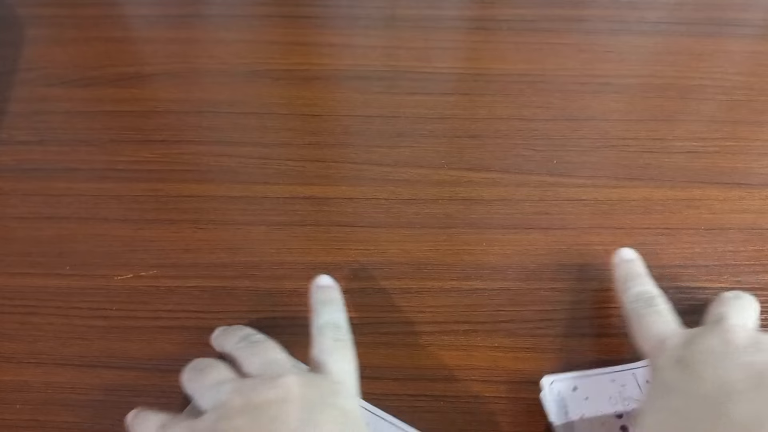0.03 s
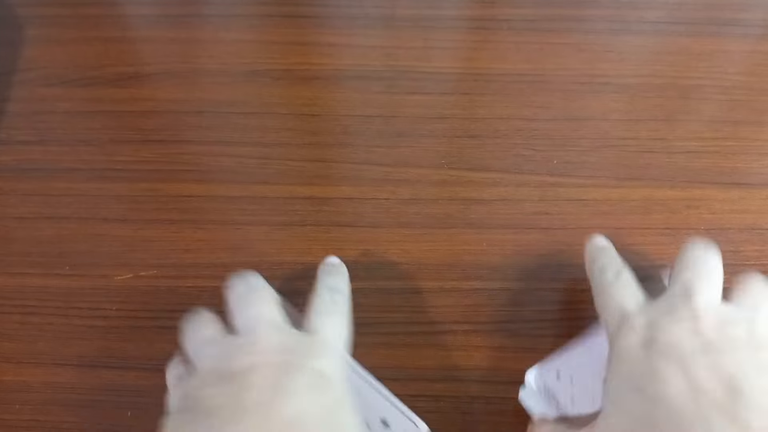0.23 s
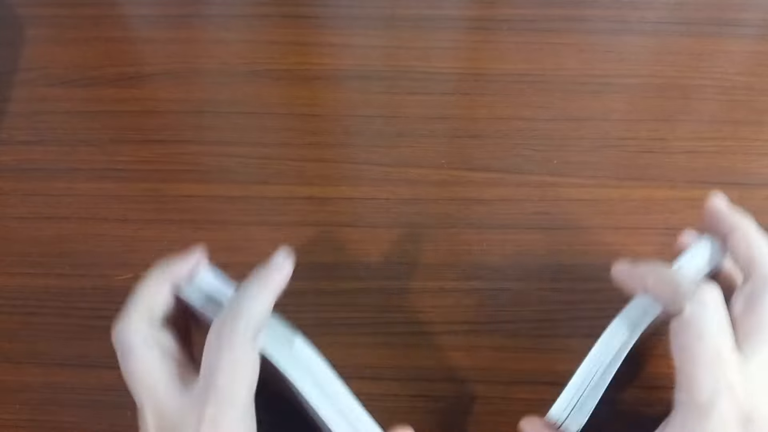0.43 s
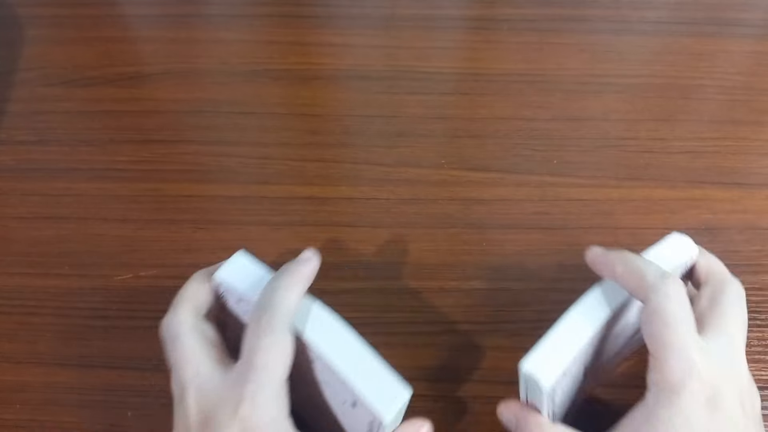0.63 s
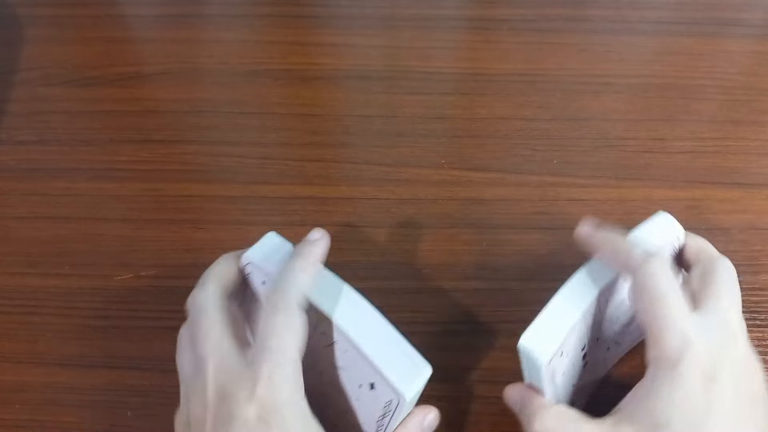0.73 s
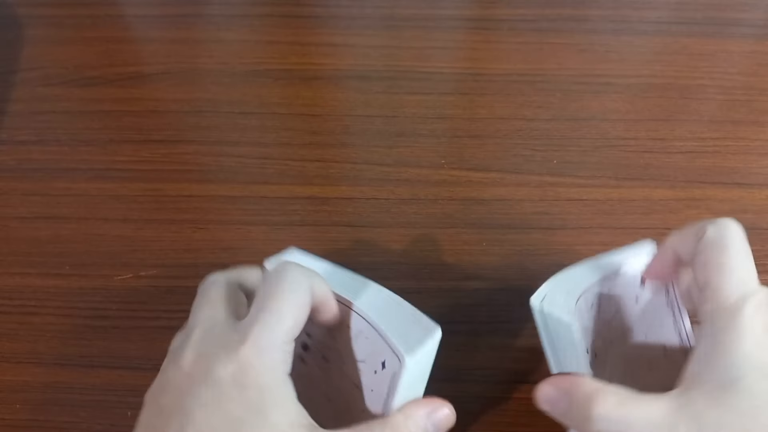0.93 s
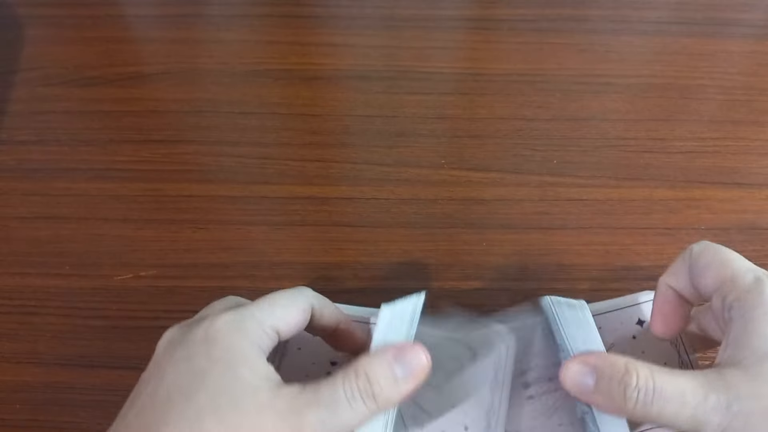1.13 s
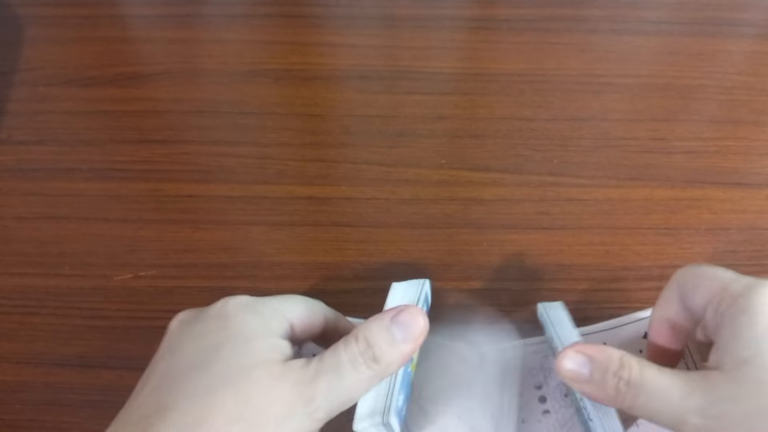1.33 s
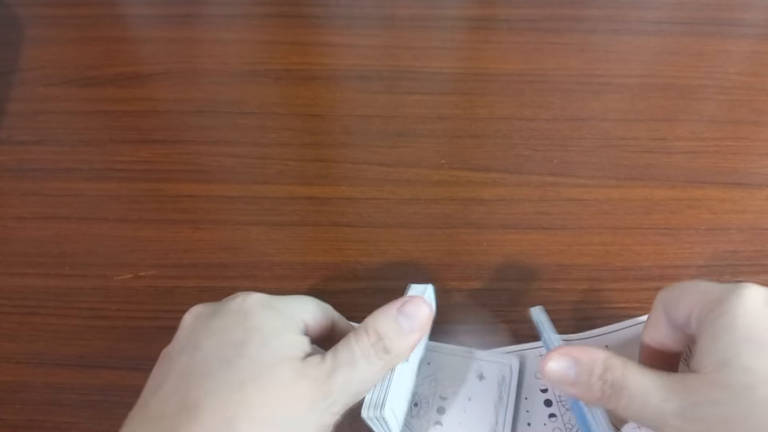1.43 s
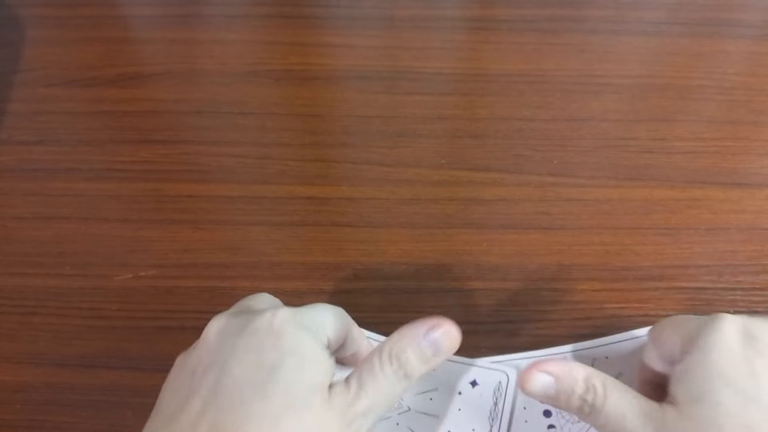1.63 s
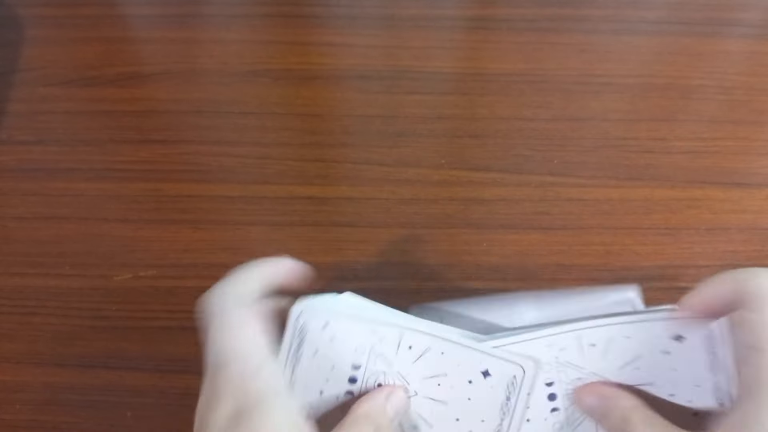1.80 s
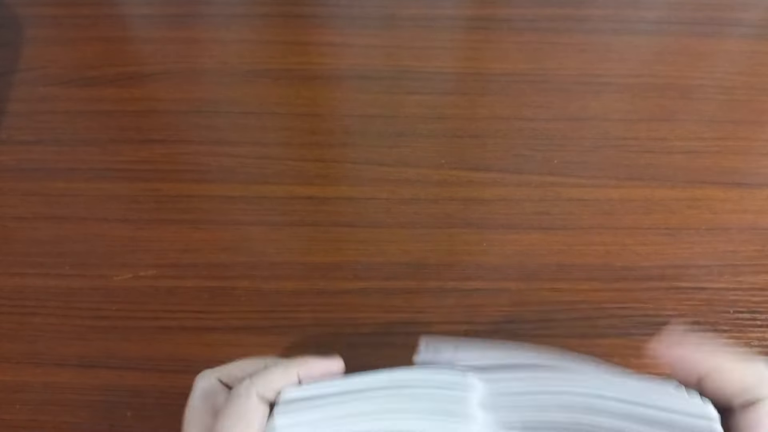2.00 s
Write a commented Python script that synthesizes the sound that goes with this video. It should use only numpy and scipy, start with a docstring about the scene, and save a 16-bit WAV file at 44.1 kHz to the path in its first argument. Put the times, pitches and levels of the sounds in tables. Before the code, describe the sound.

Playing cards riffle on a wooden table. A brief clattering knock and a pause come first, then crisp snaps grow louder and denser, stop abruptly, and a faint slide and a dull tap follow; close, dry indoor sound.

```python
"""Riffle shuffle on a table

A deck of cards is riffle-shuffled on a wooden table in a small room.
Two halves knock and clack on the wood, then the cards snap down in a fast, uneven run.
They slide softly together and the deck is set down with a dull knock.
Touches are short bursts of coloured noise, slides are grainy noise with a faint squeak.
The touches and slides make the table ring and the room echo, over a low rumble and hiss.
"""
import sys
import numpy as np
from scipy import signal
from scipy.fft import rfft, irfft
from scipy.io import wavfile

SR = 44100
rng = np.random.default_rng(int(sys.argv[2]) if len(sys.argv) > 2 else 0)


def transcribe(signal):
    """Save signal, clipped to [-1, 1], as a 16-bit WAV file at the path in sys.argv[1]."""
    frames = np.atleast_2d(signal).T
    limited = np.clip(frames, -1, 1)
    pcm = np.round(limited * 32767).astype(np.int16)
    wavfile.write(sys.argv[1], SR, pcm)


N = 90757  # length [samples]

# Every colour table below is a tone balance; only the differences between its points matter.
# background levels: (time [s], level [dB])
RUMBLE_LEVEL = [(0, -57), (.25, -53), (.52, -54.5), (.72, -60), (1.0, -55.5), (1.7, -63), (2.05, -53.5)]
HISS_LEVEL = [(0, -62.5), (.25, -62), (.5, -57.5), (.72, -68.5), (1.0, -65), (1.75, -67.5), (2.05, -65)]
# background colours: (frequency [Hz], level [dB])
RUMBLE_COLOUR = [(18, -30), (30, -3), (45, -23.5), (70, 1.5), (130, -2.5), (195, -5.5), (275, 0), (430, -3),
                 (700, -14), (1200, -19), (2500, -31), (6000, -30.5)]
HISS_COLOUR = [(1000, 4), (3000, -9), (5000, -0.5), (7000, 2), (11000, -0.5), (12500, -9.5), (16000, -6)]

# hands and packets bump softly on the table: (time [s], level [dB], rise [s], decay [s])
BUMPS = [(.002, -49, 0.0046, 0.063), (.06, -48, .01, 0.017), (.195, -45, 0.0058, 0.016),
         (0.376, -48.5, 0.0025, 0.018), (1.349, -37, 0.0079, 0.029), (1.44, -33.5, 0.0063, 0.018),
         (1.524, -34, 0.0024, 0.022), (1.603, -37, 0.005, 0.014), (1.672, -51, 0.0034, 0.011)]
# colour of a bump: (frequency [Hz], level [dB])
BUMP_COLOUR = [(20, -32), (50, -6), (80, -7), (120, 5.5), (170, -1), (260, 6.5), (340, -19.5), (700, -22),
               (2000, -56)]

# cards slide over each other: (time [s], swish level [dB], rise [s], decay [s], squeak level [dB])
SLIDES = [(0.184, -52.5, 0.019, 0.025, -81), (0.425, -56, .002, 0.0052, -69),
          (0.985, -56, 0.002, 0.0017, -67), (1.05, -60, 0.016, 0.021, -70),
          (1.76, -67, 0.041, 0.034, -69.5), (1.8178, -51, 0.0014, 0.0015, -47),
          (1.826, -51, .009, 0.034, -71), (1.898, -58, .003, 0.0058, -64), (1.912, -70, .008, .02, -63.5),
          (1.931, -66, 0.0044, 0.015, -55)]
# colour of the swish: (frequency [Hz], level [dB])
SLIDE_COLOUR = [(100, -8), (300, -12), (1500, -11), (2600, -5.5), (3300, -1), (3750, 0), (4200, 0),
                (5200, -3), (5950, 3.5), (6800, -1), (8000, -4.5), (11000, -5.5), (15000, -29)]
SLIDE_GRAIN_DB = 2  # random unevenness of the friction
SQUEAK_HZ, SQUEAK_WIDTH_HZ = 2670, 220

# a packet meets the table broadside: (time [s], level [dB], rise [s], decay [s])
KNOCKS = [(0.528, -40, 0.0052, 0.0058), (.5379, -21, 0.00072, 0.0081), (0.9838, -53, 0.00041, 0.0076)]
# colour of a knock: (frequency [Hz], level [dB])
KNOCK_COLOUR = [(20, -46), (50, -28), (110, -11), (165, -4), (270, -8), (420, 1), (500, -12), (680, -5),
                (830, 7.5), (1050, -7.5), (1350, -2), (1750, -11), (2200, -28), (4000, -32), (14000, -62)]
KNOCK_CLICK = 7  # size of the single-sample click, before the burst is set to its level

# loose card edges clack on the wood:
# (time [s], body level [dB], rise [s], body decay [s], bright edge level [dB])
CLACKS = [(0.5599, -22.5, 0.00033, .005, -37), (.5645, -22, 0.00055, 0.0043, -39),
          (.569, -22.5, 0.0018, 0.0043, -25), (0.5732, -25, 0.0011, 0.0064, -37),
          (0.577, -34, .001, 0.0046, -43), (0.587, -30, 0.0022, .012, -41.5),
          (0.604, -32, 0.0011, 0.028, -44)]
# colours of the body and the bright edge of a clack: (frequency [Hz], level [dB])
CLACK_COLOUR = [(20, -52), (70, -24), (220, -4.5), (420, 0), (720, -3), (930, 7.5), (1080, 0), (1330, -0.5),
                (1700, -1), (2900, -0.5), (3700, -7), (5000, -15), (8000, -48)]
CLACK_EDGE_COLOUR = [(2500, -23), (4600, 2.5), (6000, 1), (7500, -5), (8600, -1.5), (10000, -18),
                     (13000, -29), (16000, -49)]

# cards leave the thumbs; each part's level is shifted by its trim below:
# (time [s], slap on the pile [dB], crack of the card [dB], tick of its edge [dB])
SNAPS = [(1.075, -48.5, -57, -46), (1.096, -37.5, -38, -50), (1.1039, -37, -38, -41.5),
         (1.127, -40.5, -37, -42), (1.136, -32.5, -23.5, -26), (1.146, -28.5, -28.5, -55),
         (1.1736, -45, -32, -40), (1.183, -39.5, -42, -47), (1.191, -42, -38, -45),
         (1.204, -57, -35.5, -37.5), (1.207, -43, -40, -51), (1.214, -56, -49, -44),
         (1.221, -36.5, -32, -41.5), (1.232, -43, -39.5, -47), (1.24, -34, -42, -47),
         (1.245, -31, -29.5, -46), (1.2617, -41.5, -31, -35.5), (1.2824, -39, -33.5, -38),
         (1.293, -29.5, -33.5, -43), (1.308, -46, -32, -40), (1.3218, -39, -41, -38.5),
         (1.3343, -30, -24.5, -33), (1.348, -39, -24, -37), (1.3525, -30, -21, -30), (1.358, -39, -36, -50),
         (1.362, -51, -49, -36), (1.3722, -34.5, -34, -36), (1.388, -60, -39, -42),
         (1.398, -32.5, -21, -32.5), (1.409, -41, -48, -58), (1.417, -35.5, -28.5, -35.5),
         (1.43, -34, -25.5, -30.5), (1.442, -30.5, -31, -34.5), (1.446, -32, -29, -38),
         (1.455, -33.5, -33, -48), (1.468, -37.5, -45, -32), (1.4761, -39, -22, -26),
         (1.484, -27, -21, -26), (1.495, -26.5, -19.5, -35), (1.4984, -30.5, -27.5, -28.5),
         (1.501, -33, -24, -38), (1.511, -37, -31, -31), (1.522, -29, -29.5, -32), (1.53, -29, -29, -44),
         (1.537, -28.5, -51, -34), (1.542, -39, -20, -26.5), (1.545, -50, -29.5, -35),
         (1.552, -37, -24.5, -24.5), (1.5624, -19, -15.5, -43), (1.566, -25, -32, -27.5),
         (1.578, -43, -21.5, -28.5), (1.5822, -26, -28, -44), (1.586, -29.5, -51, -32.5),
         (1.5977, -24, -21.5, -30), (1.61, -17.5, -18, -22), (1.619, -54, -50, -49), (1.633, -30, -37, -31),
         (1.637, -63, -28.5, -32.5), (1.644, -26.5, -18, -23.5), (1.652, -62, -35.5, -43)]
SLAP_TRIM_DB, CRACK_TRIM_DB, TICK_TRIM_DB = -0.5, -1.5, 0.5
# colours of the parts of a snap, with the finest part of the tick last: (frequency [Hz], level [dB])
SLAP_COLOUR = [(20, -34), (50, -26), (110, -13), (170, -6), (250, -5.5), (340, -5.5), (480, 1), (660, -1.5),
               (950, -4), (1200, -15.5), (2500, -56)]
CRACK_COLOUR = [(800, -18.5), (1300, -8), (1550, -4.5), (1850, 2), (2150, -2), (2550, 1.5), (2950, -2.5),
                (3300, -4), (4200, -8), (6000, -27.5)]
TICK_COLOUR = [(3000, -23.5), (4600, -0.5), (5500, 1), (7500, -1), (10000, -8.5), (13000, -16.5),
               (16000, -38)]
CRISP_COLOUR = [(6000, -33), (9500, 6), (12000, 2), (16000, -0.5)]
# the finest part of the tick is strongest mid-run, where the cards are bent most:
# (time [s], level against the tick before its trim [dB])
CRISPNESS = [(1.09, -24), (1.2, -6.5), (1.27, -5), (1.4, -5), (1.5, -5.5), (1.56, -22), (1.65, -31)]
# typical times, varied from card to card
SNAP_RISE_S, SLAP_DECAY_S, CRACK_DECAY_S, TICK_DECAY_S = 0.0009, 0.0017, 0.0026, 0.0013
CARD_SPREAD = 0.25  # spread of those times, in natural-log units
CARD_COLOUR_DB = 3.5  # random spread at each colour point
SNAP_CLICK = 1.8  # size of the single-sample click, before the burst is set to its level
FLUTTER_DB, FLUTTER_DECAY_S = -18, 0.008  # the card rubs on the pile; level against the main chatter

# the whole deck is set down: (time [s], level [dB], rise [s], decay [s])
SET_DOWNS = [(1.989, -49.5, 0.0089, 0.01), (2.013, -41.5, 0.0034, .004), (2.022, -33.5, 0.00179, 0.0056),
             (2.027, -25.5, 0.001995, 0.0029)]
# colour of a set-down: (frequency [Hz], level [dB])
SET_DOWN_COLOUR = [(20, -33), (60, -17), (125, 1), (170, -3.5), (235, 1), (310, -5.5), (410, -2.5),
                   (470, -2), (540, 2), (640, -10), (760, 5.5), (850, 4), (1080, -14), (1330, -8),
                   (1600, -22.5), (2350, -13), (3000, -32), (14000, -42.5)]

LEVEL_WINDOW_S = 0.004  # a touch's level is its energy averaged over this time
GRAIN_DB = 3.0  # random unevenness of the chatter within one touch

# ringing tones of the table, all lowered by TABLE_DB:
# (frequency [Hz], strength [dB], time to fall 60 dB [s])
TABLE_TONES = [(116, -3, 0.34), (166.3, 3.5, 0.21), (236.8, 3.5, 0.15), (300, -32, 0.18), (413, -1.5, 0.14),
               (555, 0, 0.084), (634, 6, 0.081), (737, -9.5, .12), (917, -9.5, 0.057), (1910, -16, 0.036),
               (2506, 0, 0.053), (3030, -4, 0.048), (3150, -3, .04)]
TABLE_DB = -55.5

# how long the room rings: (frequency [Hz], time to fall 60 dB [s])
ROOM_T60 = [(150, 0.01), (600, 0.254), (2500, 0.1856), (6000, 0.1154), (14000, 0.16)]
# colour of the room's echo: (frequency [Hz], level [dB])
ROOM_COLOUR = [(60, -5), (200, 4), (600, -2.5), (1700, 2.5), (3000, -0.5), (5000, 2.5), (9000, -2.5),
               (15000, -4)]
TAIL_DB, TAIL_RISE_S = -15.5, 0.0052
EARLY_DB, EARLY_RISE_S, EARLY_DECAY_S = -13, 0.0017, 0.0049
CUTOFF_HZ = 15950


def from_db(db):
    """Turn decibels into a gain."""
    return 10 ** (np.asarray(db) / 20)


def unit_energy(x):
    """Scale to a total energy of one."""
    return x / np.sqrt(np.sum(x ** 2) + 1e-20)


def at_hz(points, hz):
    """Read a table at given frequencies, on a log-frequency axis."""
    f, v = np.transpose(points)
    return np.interp(np.log(np.maximum(hz, 1)), np.log(f), v)


def in_time(points):
    """Read a curve at every sample."""
    return np.interp(np.arange(N) / SR, *np.transpose(points))


def colour(x, spectrum, size=2048):
    """Give a sound a tone balance with a minimum-phase filter that keeps the level of white noise."""
    hz = np.arange(size + 1) * SR / (2 * size)
    cepstrum = irfft(np.log(from_db(at_hz(spectrum, hz))))
    # folding the cepstrum forward puts the filter's energy as early as possible
    cepstrum[1:size] *= 2
    cepstrum[size + 1:] = 0
    response = unit_energy(irfft(np.exp(rfft(cepstrum)))[:size])
    filtered = signal.fftconvolve(np.atleast_2d(x), response[None], axes=1)
    return filtered[:, :x.shape[-1]].reshape(x.shape)


def swell(t, rise, decay):
    """Rise in a straight line, then die away exponentially."""
    attack = np.clip(t / np.maximum(rise, 1e-5), 0, 1)
    return attack * np.exp(-np.maximum(t - rise, 0) / decay)


def grain(shape, spread_db):
    """Random gains, each held for 32 samples, make noise uneven."""
    return from_db(spread_db * np.repeat(rng.standard_normal(shape), 32, axis=-1))


def contacts(times, db, rise, decay, spectrum, click=0, flutter=0, uneven_db=0, size=6144):
    """Each touch is a coloured, quickly dying chatter, with an optional click and longer flutter."""
    count, t = len(times), np.arange(size) / SR
    envelope = swell(t, rise[:, None], decay[:, None])
    envelope = envelope + flutter * swell(t, rise[:, None], FLUTTER_DECAY_S)
    unevenness = grain((count, size // 32), GRAIN_DB)
    chatter = rng.standard_normal((count, size)) * envelope * unevenness
    # the click falls where the rise ends
    chatter[np.arange(count), (rise * SR).astype(int)] += click
    tints = uneven_db * rng.standard_normal((count, len(spectrum)))
    out = np.zeros(N + SR)
    for s, level, burst, tint in zip(times, db, chatter, tints):
        start = max(int(s * SR), 0)
        # the tint shifts the levels in the colour table, not its frequencies
        burst = colour(burst, np.array(spectrum) + np.outer(tint, [0, 1]))
        gain = from_db(level) * np.sqrt(LEVEL_WINDOW_S * SR)
        out[start:start + size] += gain * unit_energy(burst)
    return out[:N]


def background():
    """Low room noise and a thin hiss, each coloured noise that follows its own level curve."""
    rumble = from_db(in_time(RUMBLE_LEVEL)) * colour(rng.standard_normal(N), RUMBLE_COLOUR)
    hiss = from_db(in_time(HISS_LEVEL)) * colour(rng.standard_normal(N), HISS_COLOUR)
    return rumble + hiss


def bumps():
    """Hands and packets touch the table softly, giving low bursts without a click."""
    return contacts(*np.transpose(BUMPS), BUMP_COLOUR)


def slides():
    """Friction of card on card gives short grainy swishes and excites a faint squeaking resonance."""
    t = np.arange(N) / SR
    swish, squeak = np.zeros(N), np.zeros(N)
    for s, swish_db, rise, decay, squeak_db in SLIDES:
        shape = swell(t - s, rise, decay)
        swish += from_db(swish_db) * shape
        squeak += from_db(squeak_db) * shape
    friction = rng.standard_normal(N) * grain(N // 32 + 1, SLIDE_GRAIN_DB)[:N]
    resonance = signal.iirpeak(SQUEAK_HZ, SQUEAK_HZ / SQUEAK_WIDTH_HZ, fs=SR)
    # make up for the noise lost outside the narrow band
    makeup = np.sqrt(SR / (np.pi * SQUEAK_WIDTH_HZ))
    return colour(swish * friction, SLIDE_COLOUR) + makeup * signal.lfilter(*resonance, squeak * friction)


def knocks():
    """A packet strikes the table broadside, with a click inside a dull burst."""
    return contacts(*np.transpose(KNOCKS), KNOCK_COLOUR, KNOCK_CLICK)


def clacks():
    """Cards land on their edges in a tight cluster, each with a body and a shorter bright edge."""
    s, body_db, rise, decay, edge_db = np.transpose(CLACKS)
    body = contacts(s, body_db, rise, decay, CLACK_COLOUR)
    edge = contacts(s, edge_db, rise, decay * 0.66, CLACK_EDGE_COLOUR)
    return body + edge


def riffle():
    """Each card ticks off the thumb, cracks straight and slaps the pile, all within one short snap."""
    s, slap, crack, tick = np.transpose(SNAPS)
    # each card has its own rise and length, shared by all parts of its snap
    spread = np.clip(rng.standard_normal((len(s), 2)), -2, 2)
    rise, length = np.exp(CARD_SPREAD * spread).T
    crisp = tick + np.interp(s, *np.transpose(CRISPNESS))
    parts = [(slap + SLAP_TRIM_DB, SLAP_DECAY_S, SLAP_COLOUR),
             (crack + CRACK_TRIM_DB, CRACK_DECAY_S, CRACK_COLOUR),
             (tick + TICK_TRIM_DB, TICK_DECAY_S, TICK_COLOUR),
             (crisp, TICK_DECAY_S, CRISP_COLOUR)]
    out = np.zeros(N)
    for db, decay, spectrum in parts:
        out += contacts(s, db, SNAP_RISE_S * rise, decay * length, spectrum,
                        click=SNAP_CLICK, flutter=from_db(FLUTTER_DB), uneven_db=CARD_COLOUR_DB)
    return out


def set_downs():
    """The whole deck meets the table in a few close, dull blows."""
    return contacts(*np.transpose(SET_DOWNS), SET_DOWN_COLOUR, KNOCK_CLICK)


def table(blows):
    """The table top rings as a set of decaying tones, driven by the sound of the cards."""
    out = np.zeros(N)
    for hz, db, t60 in TABLE_TONES:
        r = from_db(-60 / (t60 * SR))  # gain left after each sample
        w = 2 * np.pi * hz / SR  # turn per sample [radians]
        ring = signal.lfilter([0, np.sin(w)], [1, -2 * r * np.cos(w), r * r], blows + 1e-18)
        out += from_db(db + TABLE_DB) * ring
    return out


def room(x):
    """Walls return a short early burst and a tail whose bands each die at their own rate."""
    t = np.arange(SR // 2) / SR
    tail = np.zeros(len(t))
    edges = np.geomspace(50, 18000, 9)  # band limits [Hz]
    for low, high in zip(edges, edges[1:]):
        band_filter = signal.butter(2, [low, high], "band", fs=SR, output="sos")
        band = signal.sosfilt(band_filter, rng.standard_normal(len(t)))
        # a 60 dB fall is a factor of 1000
        decay = at_hz(ROOM_T60, np.sqrt(low * high)) / np.log(1000)
        tail += band * swell(t, TAIL_RISE_S, decay)
    early = rng.standard_normal(len(t)) * swell(t, EARLY_RISE_S, EARLY_DECAY_S)
    response = from_db(TAIL_DB) * unit_energy(tail) + from_db(EARLY_DB) * unit_energy(early)
    return signal.fftconvolve(x, colour(response, ROOM_COLOUR))[:N]


def scene():
    """Add the cards, the ringing table, the room and the background into one channel."""
    cards = riffle() + knocks() + set_downs() + bumps() + clacks() + slides()
    return (cards + table(cards) + room(cards) + background())[None]


def record(dry):
    """Cut the top of the treble steeply with a low-pass filter."""
    low_pass = signal.ellip(10, 0.1, 70, CUTOFF_HZ, fs=SR, output="sos")
    return signal.sosfilt(low_pass, dry)


dry = scene()
out = record(dry)
transcribe(out)
```